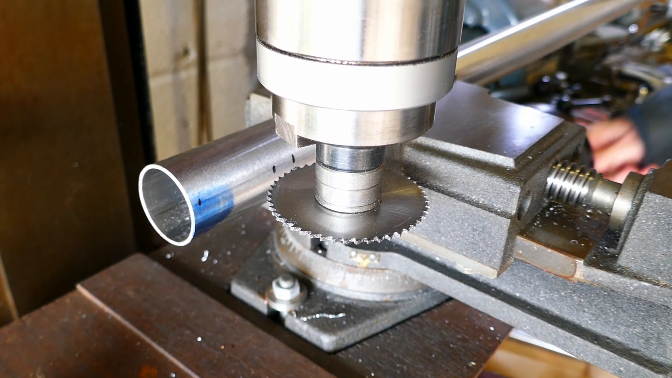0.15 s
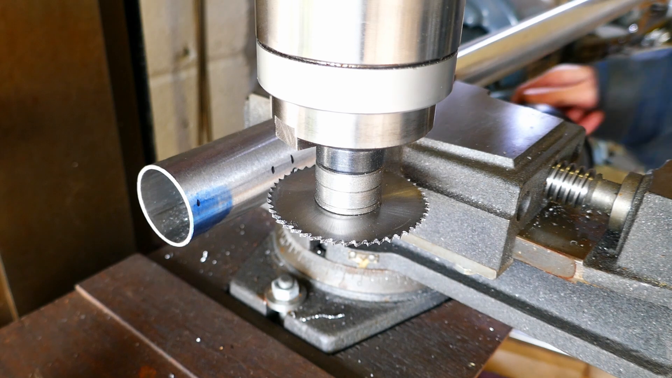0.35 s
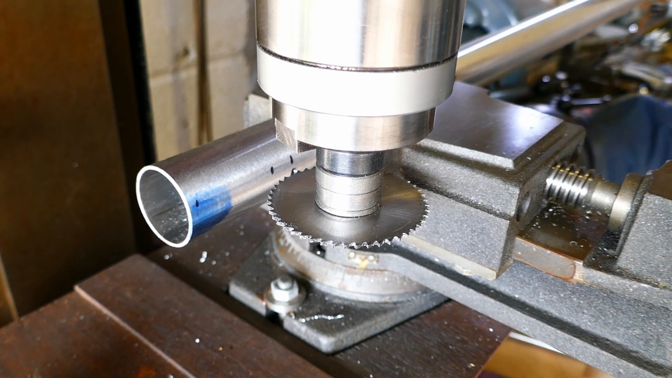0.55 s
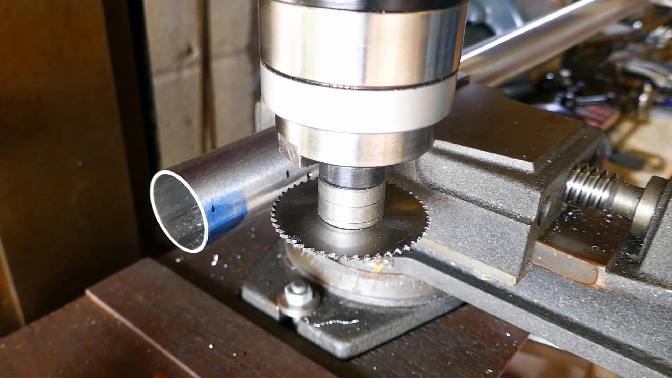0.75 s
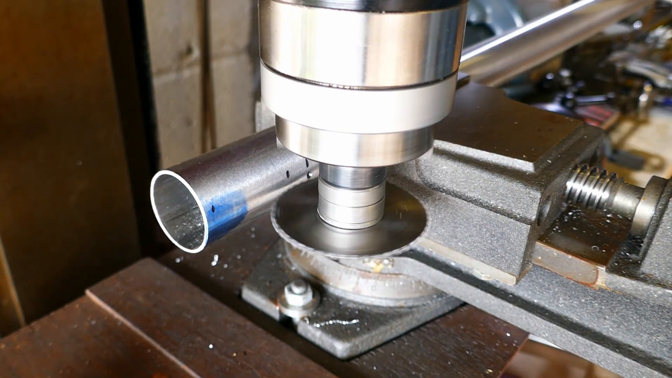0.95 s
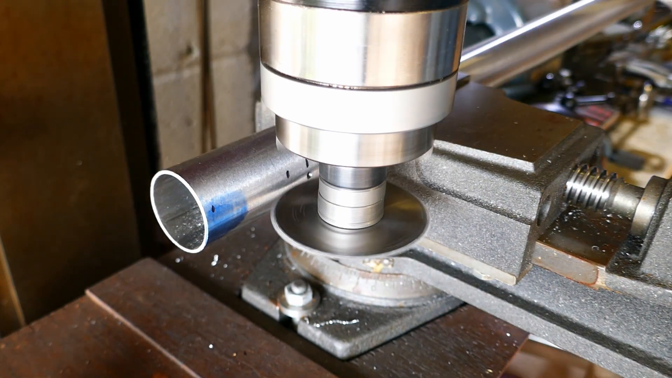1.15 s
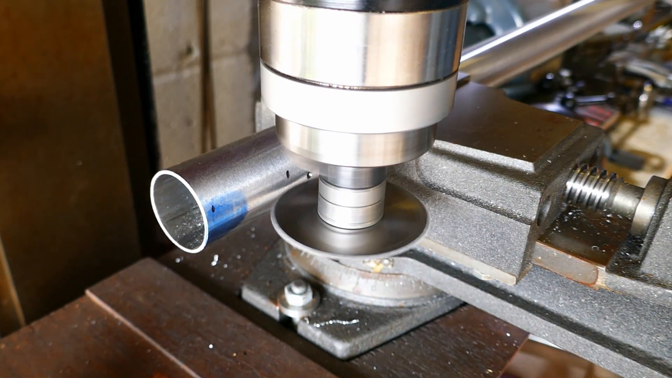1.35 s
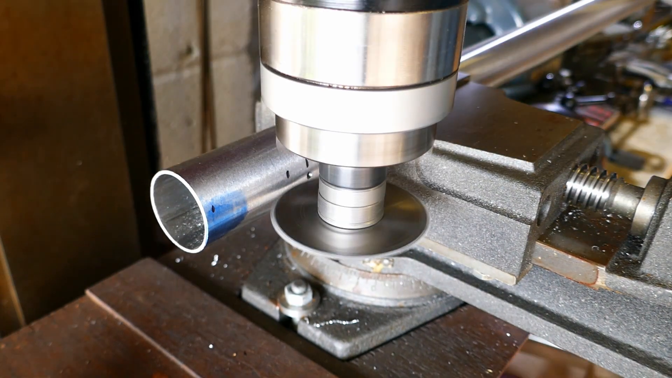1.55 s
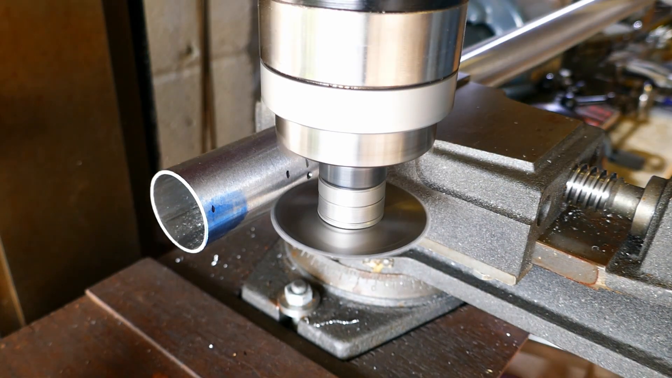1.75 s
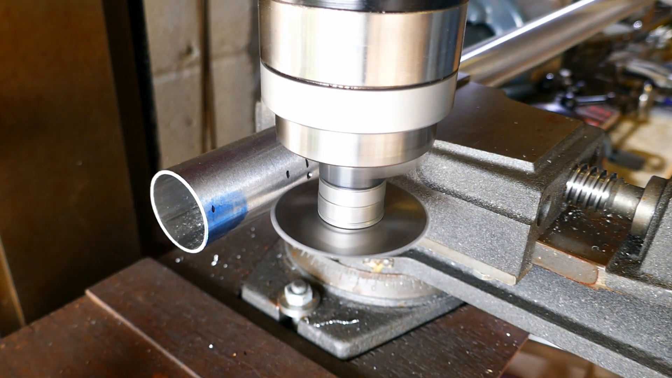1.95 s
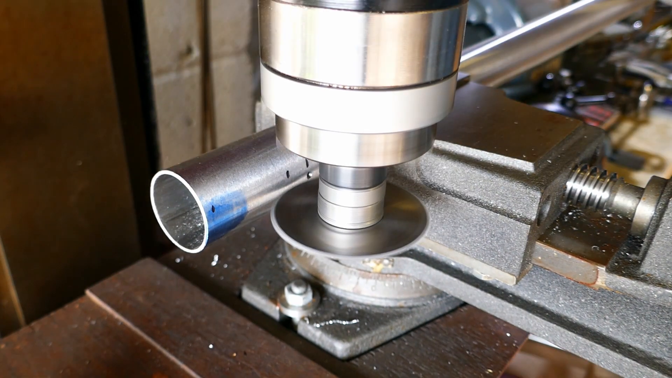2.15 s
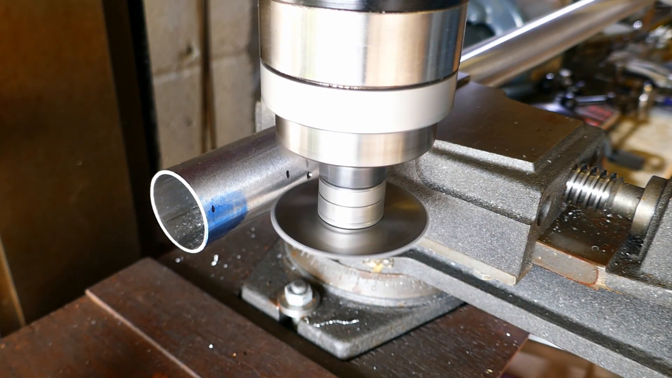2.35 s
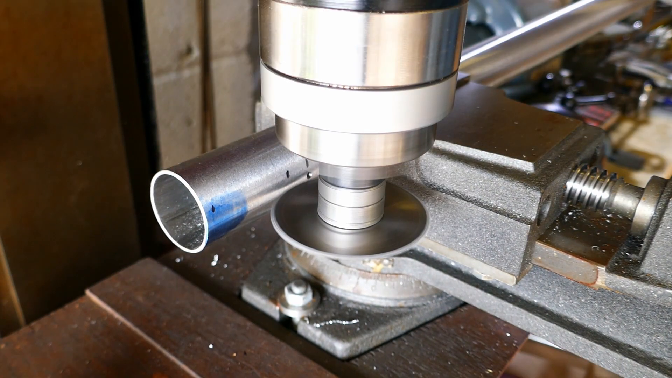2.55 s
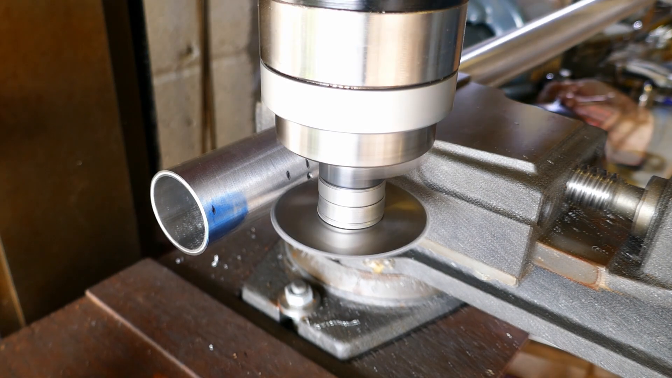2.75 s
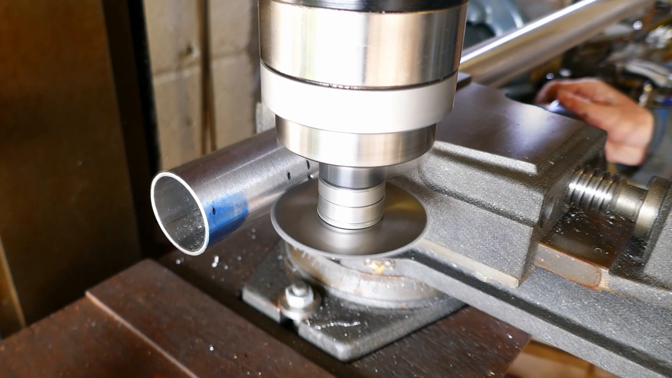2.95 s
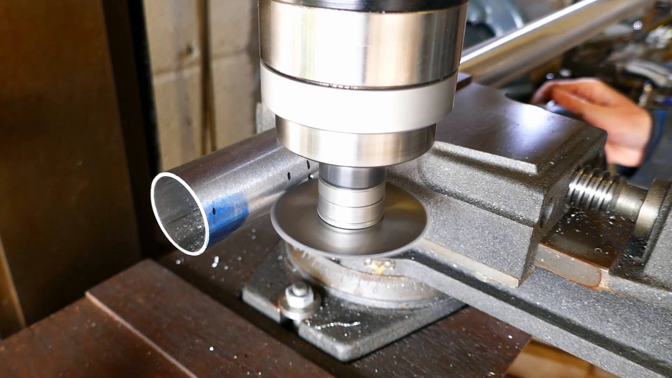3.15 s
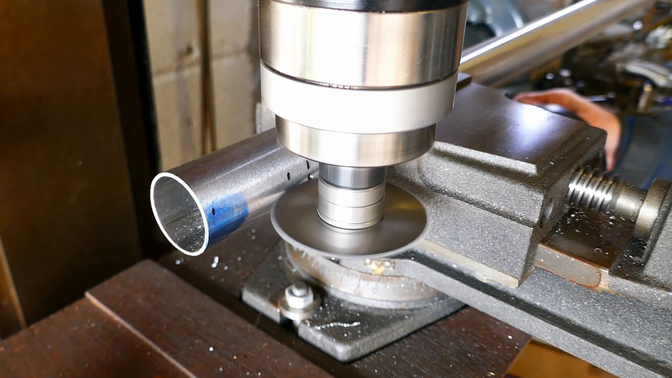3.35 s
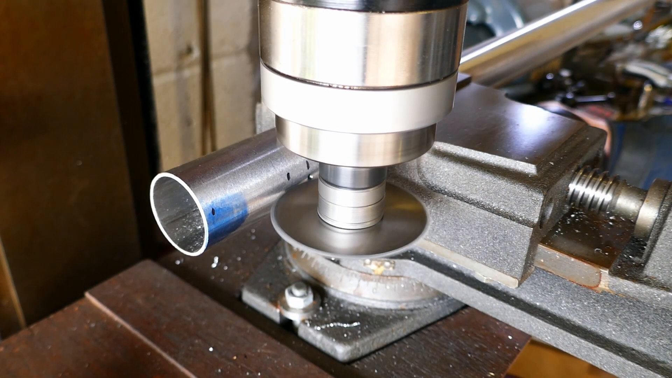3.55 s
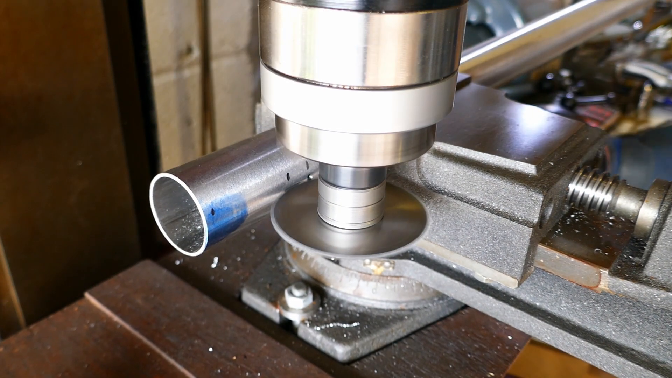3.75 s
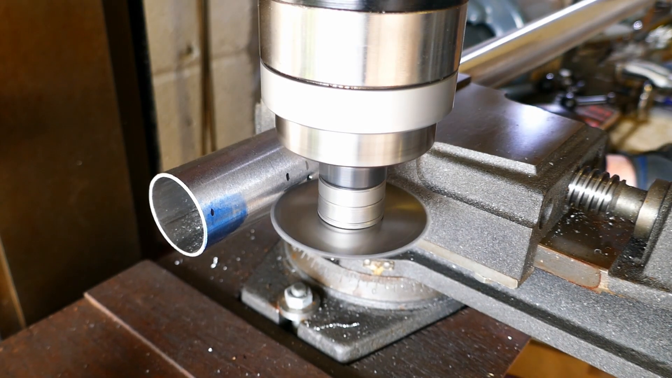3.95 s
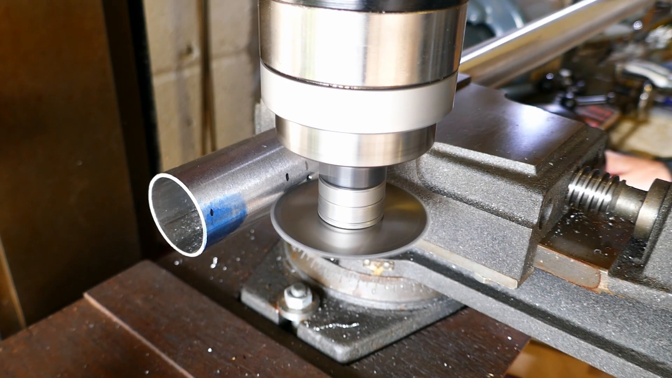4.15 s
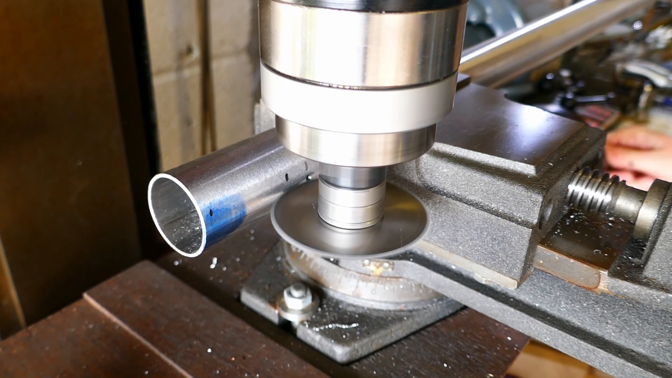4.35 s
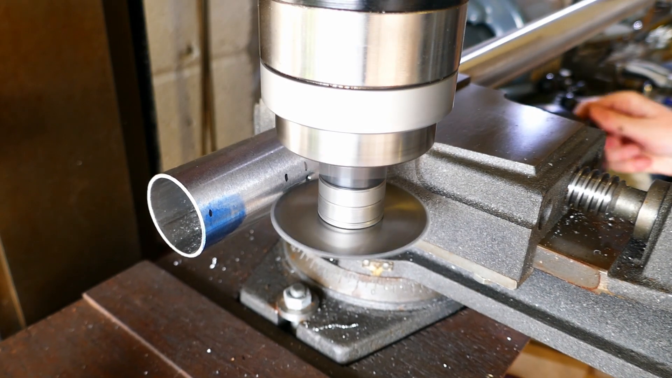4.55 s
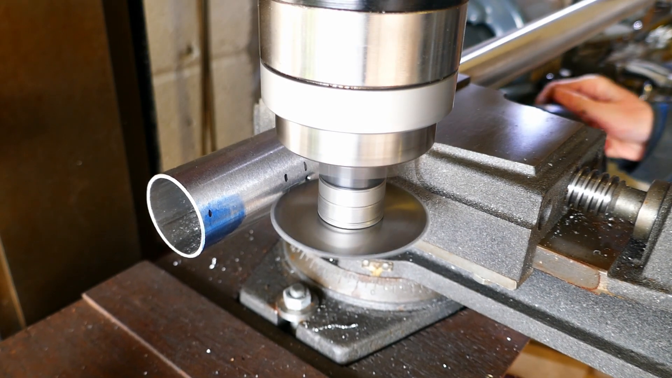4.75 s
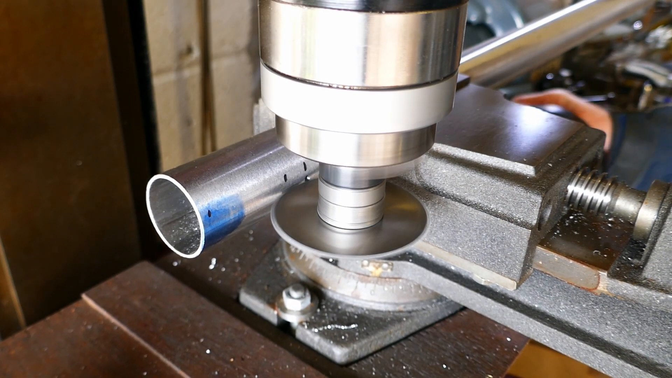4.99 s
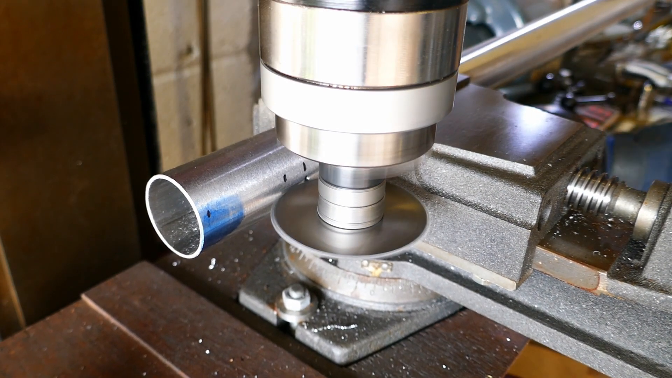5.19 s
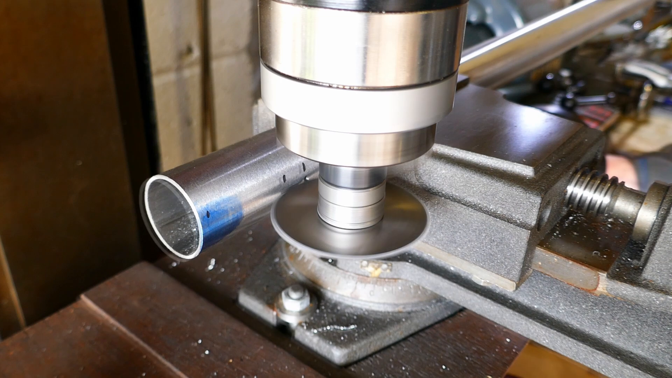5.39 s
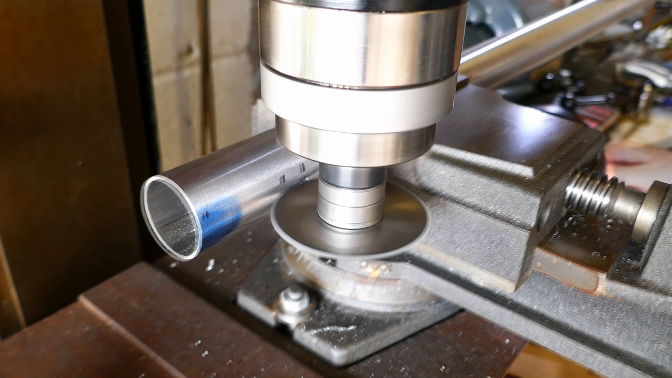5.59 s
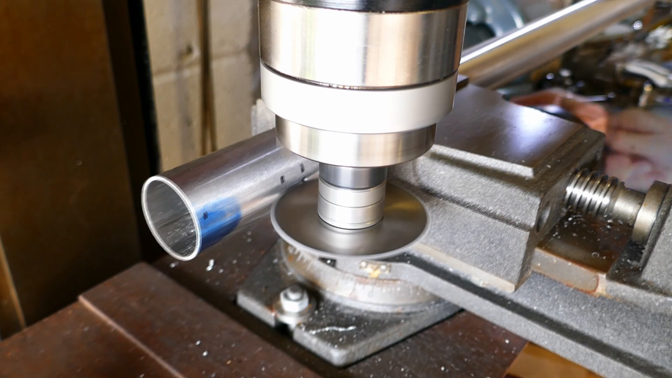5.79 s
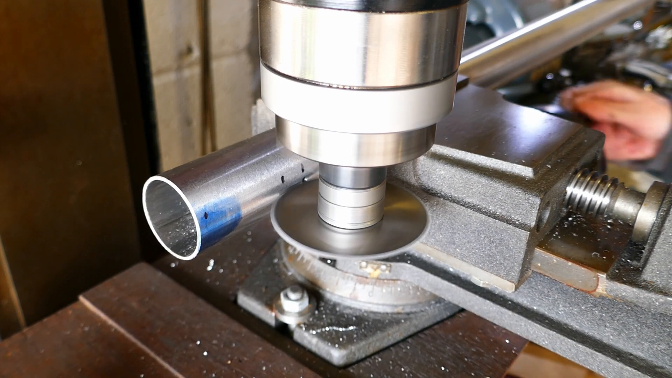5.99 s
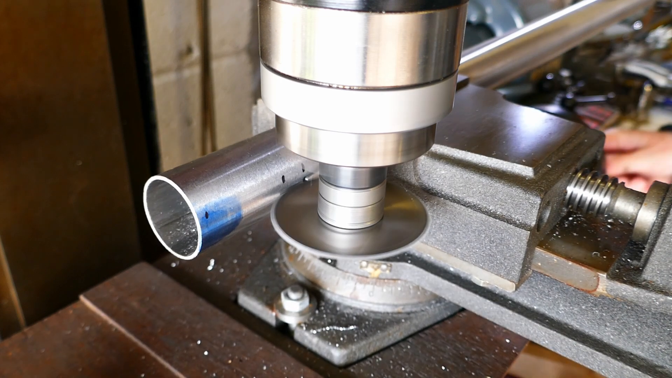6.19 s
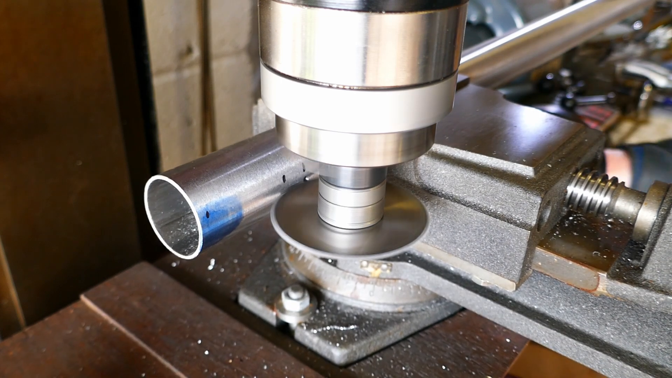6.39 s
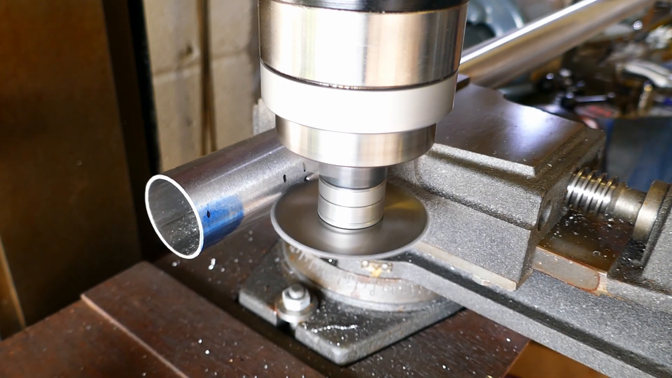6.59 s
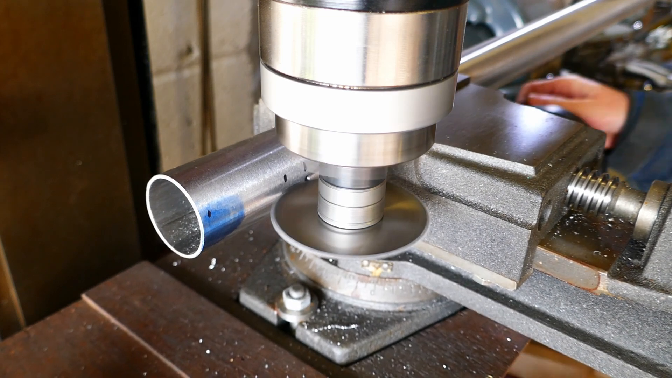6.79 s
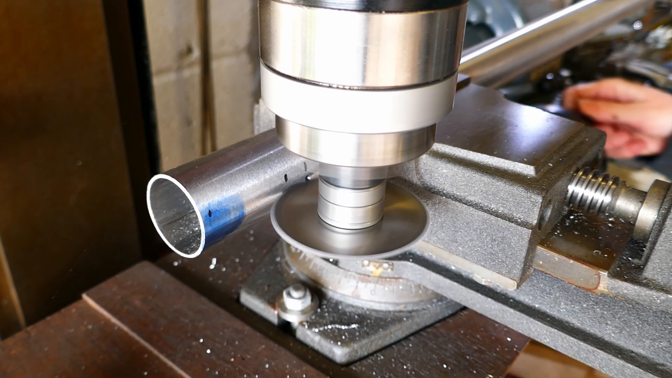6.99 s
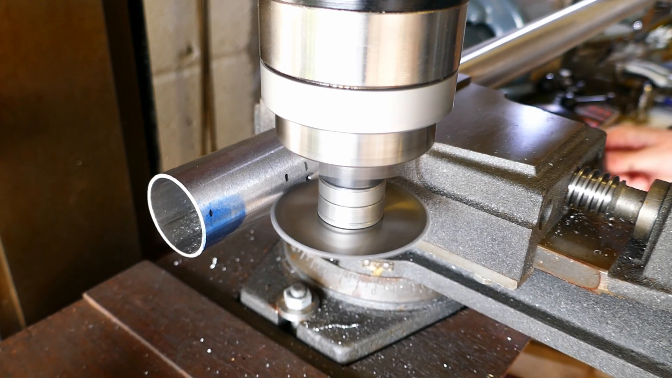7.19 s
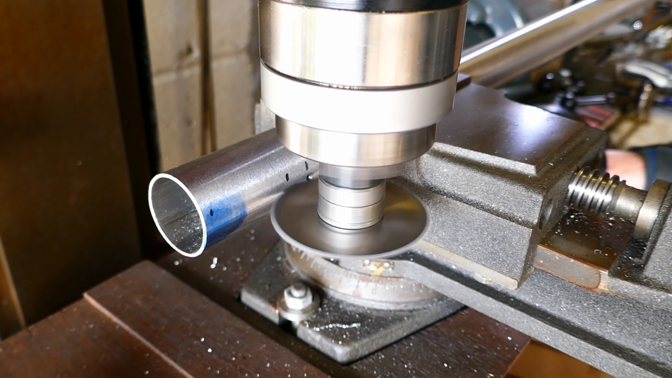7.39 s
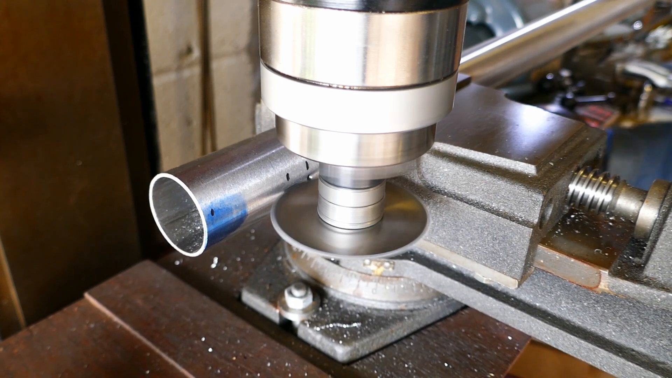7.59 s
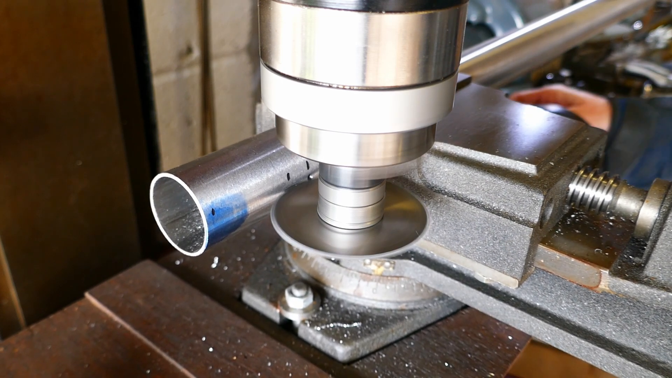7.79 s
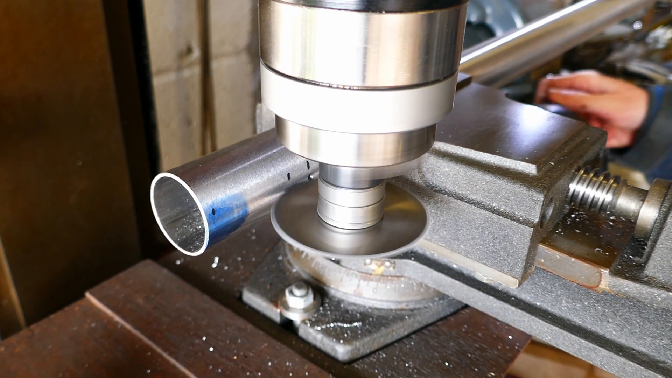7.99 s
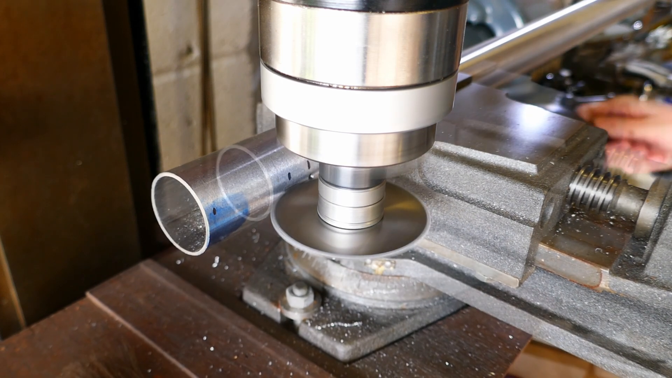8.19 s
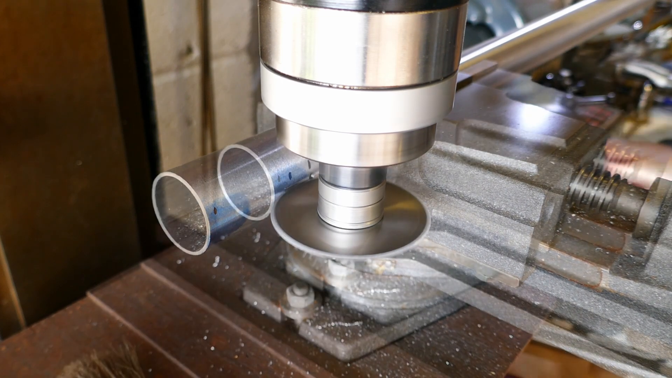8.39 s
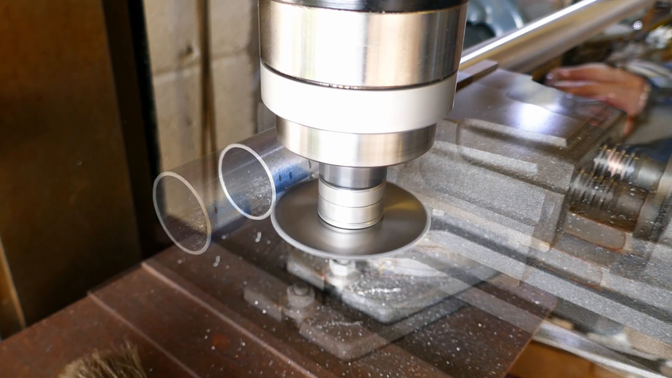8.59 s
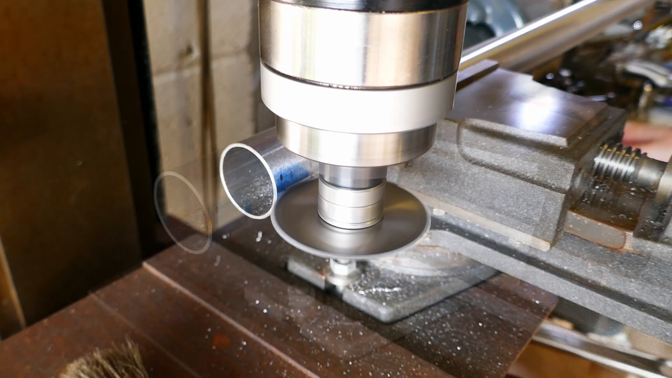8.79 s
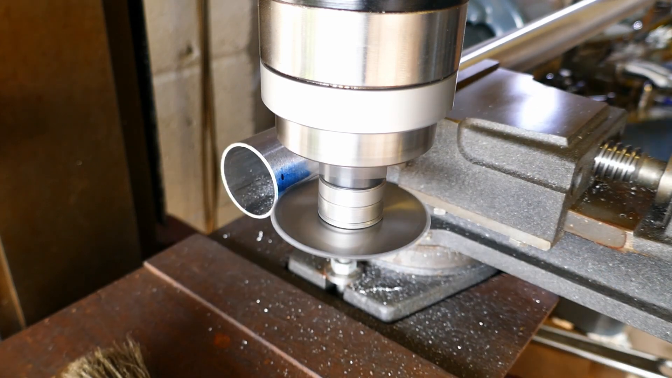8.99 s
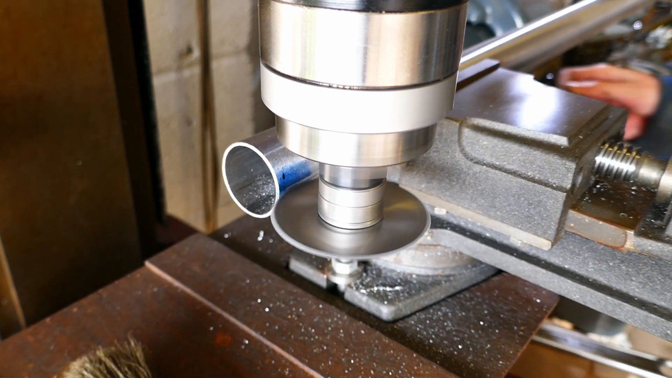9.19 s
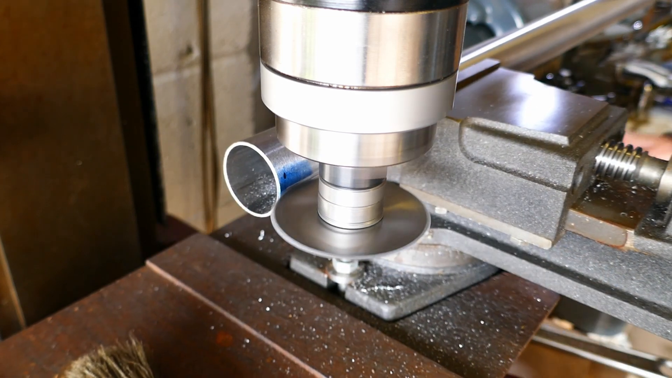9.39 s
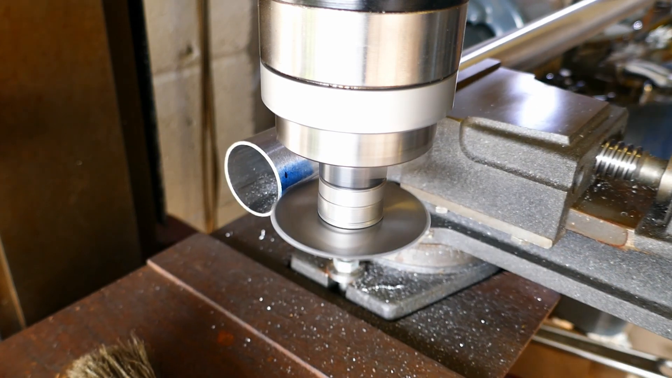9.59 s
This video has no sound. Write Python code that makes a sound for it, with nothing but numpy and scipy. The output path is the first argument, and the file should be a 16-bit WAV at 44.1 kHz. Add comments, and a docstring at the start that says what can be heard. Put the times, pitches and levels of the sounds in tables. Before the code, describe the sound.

Machine gears clatter and roar up, then a toothed blade crunches into thin metal tube about ten times a second, rasping and ringing.

```python
"""A handwheel squeaks over idling gears and a sliding table; a switch clunks and the drive runs up hard.
Then a slitting saw, slightly off centre, bites a thin steel tube once a turn: it rasps, tube and blade ring.
Toothed contacts are shaped noise, filtered by the cast frame's resonances or smeared by thin steel.
Rings are narrow-band modes driven by the load; squeaks, zings and gear tones are wavering sines.
The milling machine stands close by in a small workshop and is heard through two microphone ports."""
import sys
import numpy as np
from scipy import signal
from scipy.fft import rfft, irfft, next_fast_len
from scipy.io import wavfile

SR = 44100
rng = np.random.default_rng(int(sys.argv[2]) if len(sys.argv) > 2 else 0)


def log_audio(samples):
    """Write samples as a 16-bit WAV file to the path given in sys.argv[1]."""
    # one column per channel
    frames = np.atleast_2d(samples).T
    # limit to full scale, then quantise
    limited = np.clip(frames, -1, 1)
    pcm = np.round(limited * 32767).astype(np.int16)
    wavfile.write(sys.argv[1], SR, pcm)


N = 425124
T = np.arange(N) / SR
HZ = np.fft.rfftfreq(8192, 1 / SR)  # frequency grid of the colouring filters
EDGE_HZ = 15700  # upper edge of the sound

# Saw passes, one bite a turn: (first bite [s], end [s], one turn [s])
PASSES = [(2.8772, 5.76, .101752), (5.7809, 8.47, .10149), (8.5413, 9.64, .101645)]
# Grip of each pass before the mix: (crunch [dB], blade ring [dB], blade whistle [dB], rubbing [dB])
GRIP = [(-39.5, -55, -58, -56), (-40, -55.5, -56, -55.5), (-42.5, -59, -55, -60)]
# Teeth that catch in each pass, relative to the bite:
# (drag [dB], first tooth [dB], proud tooth after the bite [s], proud tooth [dB], late tooth [dB])
TEETH = [(-30, -7.5, 0.038, -1.5, -13.5), (-34, -15, 0.0399, -0.5, -26), (-15, -20, 0.0417, 1.5, -7)]
# Rasp as the feed varies: (time [s], level [dB])
RASP_LEVEL = [(2.8, -50), (4.3, -49.5), (5.75, -51), (5.78, -50), (6.2, -48), (6.6, -49.5), (7.25, -48),
              (7.62, -51), (8.25, -49), (8.65, -52.5), (9.64, -54.5)]
# Spectra of crunch and rasp: (frequency [Hz], relative density [dB])
CRUNCH_TONE = [(100, -37), (330, -16), (470, 0), (620, -13), (950, -2), (1400, 5.5), (1800, -4),
               (2150, -2.5), (2500, 2.5), (3200, -6), (6000, -27)]
RASP_TONE = [(1500, -32), (2500, -24), (2860, 2), (3100, -10), (3600, 3.5), (4060, -1.5), (4600, -7),
             (5100, -5.5), (5600, 0.5), (6600, 6.5), (7900, -8.5), (9100, 6.5), (9700, -7), (12900, -3.5),
             (14800, -18)]
# Squeals of chips and tooth tips: (frequency [Hz], width [Hz], relative level [dB])
CHIP_SQUEALS = [(3900, 590, -1), (5560, 110, -5), (6590, 13, -5), (9080, 170, -4.5)]
# Tube modes, then the rougher ones when clamped shorter: (frequency [Hz], width [Hz], relative level [dB])
TUBE_MODES = [(3335, 39, -15), (3805, 9.5, 0.8)]
SHORT_TUBE_MODES = [(2200, 32, -1.5), (3790, 16, -2.5), (3886, 55, -2), (4010, 80, -11), (11050, 900, -9),
                    (14200, 220, -14)]
# Tube ring, which swells and fades as the slot deepens: (time [s], level [dB])
TUBE_RING = [(2.86, -57), (3.0, -47.5), (3.19, -46), (3.4, -43), (3.5, -51.5), (3.8, -51.5), (4.32, -51),
             (4.42, -58), (4.72, -48), (4.82, -48.5), (4.93, -48), (5.3, -48), (5.53, -52.5), (5.74, -46.5),
             (5.79, -55.5), (5.89, -52), (6.3, -51), (6.5, -46.5), (6.7, -54), (6.9, -44.5), (7.11, -47),
             (7.21, -50.5), (7.41, -44.5), (7.9, -53), (8.12, -50.5), (8.43, -51.5), (8.96, -46.5),
             (9.35, -49), (9.64, -48)]
# Ringing kept up by rubbing between bites: (time [s], level relative to the bite [dB])
TUBE_SUSTAIN = [(2.86, -15), (3.3, -16), (3.6, -13.5), (5.76, -17.5), (5.8, -20), (7.2, -25), (7.7, -23),
                (8.6, -12), (9.64, -14)]
# Low and high zing of the chips, and chirp of the last cut: (time [s], level [dB])
LOW_ZING = [(2.86, -51), (3.2, -61), (3.4, -47), (3.7, -48.5), (3.9, -45.5), (4.41, -48), (4.52, -54),
            (5.74, -60), (6.15, -43.5), (6.5, -55), (6.61, -45), (6.91, -45), (7.11, -50.5), (7.3, -57),
            (7.72, -52), (7.82, -43), (7.92, -53), (9.64, -51)]
HIGH_ZING = [(2.86, -57), (3.1, -58), (4, -53), (5.7, -45.5), (5.9, -43.5), (6.6, -47.5), (6.8, -57.5),
             (8.5, -49)]
LAST_CHIRP = [(8.5, -47.5), (8.76, -50), (9, -46.5), (9.64, -51)]
# Low gear throb once a turn: (time [s], level [dB])
THROB_LEVEL = [(2.86, -59), (3.3, -62.5), (4, -60.5), (5.76, -58), (5.82, -80), (6.05, -70), (7.2, -72),
               (7.9, -63.5), (9.64, -60)]
# Gear clatter idling, running hard and cutting: (time [s], level [dB])
IDLE_LEVEL = [(0, -71), (.03, -51), (.2, -56), (.33, -52), (.42, -57.5), (.5, -51), (.57, -57.5),
              (.65, -56.5), (.68, -68)]
HARD_LEVEL = [(.93, -73), (1.0, -47), (1.12, -44.5), (1.2, -43), (1.31, -40), (1.43, -38), (1.49, -35.5),
              (1.7, -35), (2.0, -35), (2.3, -35.5), (2.86, -35.5), (2.89, -71)]
CUTTING_LEVEL = [(2.86, -50), (2.88, -44), (3.0, -45.5), (4.2, -45), (5.76, -44.5), (5.81, -48.5),
                 (7.5, -47), (7.9, -45.5), (8.45, -44.5), (8.7, -43.5), (9.64, -43.5)]
# Spectra of that clatter and of the harsh ring of hard running: (frequency [Hz], relative density [dB])
IDLE_TONE = [(30, -35), (70, -6), (140, 1), (330, 6), (600, -8), (950, -5.5), (1400, -4.5), (2100, -7),
             (3000, -16.5), (5000, -17), (7500, -30), (11000, -24), (14500, -48)]
HARD_TONE = [(30, -50), (110, -25.5), (175, -22), (330, -5.5), (600, -10), (980, -3), (1400, -2), (1850, 2),
             (2500, -5), (2900, -11), (3500, -6), (4500, -21.5), (6200, -28.5), (14000, -30.5)]
CUTTING_TONE = [(30, -50), (90, -42), (200, -19), (330, -5), (600, -9), (950, -2), (1400, -4), (2000, 1),
                (2500, -5), (2900, -8.5), (3350, -4.5), (4400, -11), (5000, -11.5), (7800, -17.5),
                (11000, -14), (14500, -25.5)]
STRAIN_TONE = [(800, -26), (1010, 15), (1300, 5), (2750, -11), (3110, 12), (3950, -16), (4400, 7.5),
               (5200, 1.5), (6200, -8), (7500, -1), (8500, -10), (10200, -5), (12900, -15), (13900, -2),
               (15500, -62)]
# Shudder of the column under load: (time [s], level [dB]), then (frequency [Hz], relative density [dB])
RUMBLE_LEVEL = [(.95, -57), (1.38, -56.5), (1.48, -60), (1.75, -63), (2.8, -66), (3.1, -67), (5.76, -64),
                (5.82, -88.5), (7.5, -74), (7.9, -65), (9.64, -65.5)]
RUMBLE_TONE = [(30, -29), (80, -2.5), (115, -15), (135, -16), (162, 8), (185, -9), (208, -0.5), (260, 12.5),
               (500, -56.5)]
# Resonances of the cast frame, table and vice: (frequency [Hz], width [Hz], full lift [dB])
FRAME_MODES = [(159, 69, 3.5), (206.6, 7.9, 16), (309, 19, 8), (349, 27.3, 16), (440.7, 9.6, 14),
               (505.4, 106, 12.5), (570, 67.4, 13.5), (613.8, 31.6, 18), (705, 53, 15), (799, 67, 13.5),
               (865, 32, 6), (915, 86, 11.5), (1030, 110, 3), (1173, 25, 10.5), (1444, 17.5, 9),
               (1640, 40, 7.5), (1746, 24, 9), (1890, 120, 9), (2098, 35, 11), (3176, 20, 11.5)]
# Wavering gear tones, of which the close pair beats: (frequency [Hz], relative level [dB])
GEAR_TONES = [(166.9, -87.5), (347.6, -69), (350.4, -65), (796.7, -72.5)]
# Their common gain: (time [s], level [dB])
GEAR_LEVEL = [(0, -5), (.64, -31), (.68, -40), (.92, -19.5), (1.1, 11.5), (1.3, 3), (1.42, 10),
              (1.46, 24.5), (1.54, 23), (1.59, 15), (1.66, 18), (2.05, 11.5), (2.8, -7), (3, 7), (5.7, 7),
              (5.9, 7), (9.64, 8)]
# Switch, clutch and gears taking up slack, before the mix:
# (time [s], knock [dB], thud [dB], tick [dB], clank [dB], 60 dB decay of the knock [s])
KNOCKS = [(0.617, -48, -62, -56.5, -77, 0.041), (0.7922, -34, -29.5, -31.5, -62, 0.016),
          (0.91, -41, -51, -38.5, -56, 0.26), (0.923, -30.5, -40.5, -41, -33.5, 0.15),
          (0.998, -41, -70, -57, -54, 0.12), (1.05, -40, -66, -60, -55, 0.22),
          (1.155, -35.5, -64, -59, -47, 0.13), (1.202, -33.5, -49, -50, -40, 0.052),
          (1.271, -37, -58, -40, -54.5, 0.1), (1.326, -32, -44, -53, -49, 0.082),
          (1.335, -37, -58, -44, -55, 0.091), (1.387, -32, -47, -43.5, -48, 0.051),
          (1.444, -35, -54, -41, -40, 0.082)]
# Spectra of knock, tick and thud: (frequency [Hz], relative density [dB])
KNOCK_TONE = [(50, -54.5), (150, -8), (400, 5.5), (700, 6.5), (1120, 8.5), (1500, 4), (2000, 6), (2900, -5),
              (3400, -8), (4500, -12), (7000, -30), (14000, -51)]
TICK_TONE = [(700, -8), (3000, 13), (5000, 1), (6300, -2), (7800, 3), (11000, 1), (15000, -6)]
THUD_TONE = [(50, -23), (120, -29), (172, 8), (250, -2), (310, -2), (410, -8), (520, -6), (1300, -10.5),
             (2200, -3), (2850, -7), (4000, -33), (8000, -39)]
# Struck modes of the housing and the gears: (frequency [Hz], relative level [dB], 60 dB decay [s])
HOUSING_MODES = [(167.7, -4, 0.41), (201, 6.5, 0.15), (303, -9, 0.86), (409, -6, 0.36), (455, -1.5, 0.22),
                 (727, -7.5, 0.25)]
GEAR_MODES = [(553, -1.5, 0.23), (710, -4, 0.34), (798, 3, .08), (920, 1.5, .15), (1160, 1, 0.16)]
# Squeaks: (time [s], length [s], start [Hz], end [Hz], relative level [dB], fall per overtone [dB])
SQUEAKS = [(.05, 0.09, 2170, 2090, -59, 30), (0.275, 0.051, 1640, 1710, -54, 30),
           (0.316, 0.053, 11330, 11250, -43, 40), (0.337, 0.028, 1650, 1580, -40, 26),
           (0.357, 0.0364, 2900, 2660, -44, 12), (0.365, 0.082, 2880, 2750, -51.5, 14),
           (0.488, 0.066, 2150, 2120, -60, 30)]
# Table sliding on its ways: (time [s], level [dB]), then (frequency [Hz], relative density [dB])
SLIDE_LEVEL = [(0, -57), (.03, -54), (.1, -65), (.28, -75), (.38, -55.5), (.47, -55), (.56, -69),
               (.68, -100)]
SLIDE_TONE = [(1500, 7), (3000, 3), (5000, -6), (7500, -4), (11000, -1.5), (14000, -2), (15500, -9)]
# Quiet of the workshop: (frequency [Hz], relative density [dB])
ROOM_TONE = [(18, -35), (30, -51), (75, -10), (240, -2), (2080, -15.5), (5880, -39), (15000, -32)]
# Likeness of the two ports: (frequency [Hz], coherence [0-1])
PORT_LIKENESS = [(30, 0.2), (120, 0.8), (480, 0.955), (2000, 0.95), (3800, 0.88), (7500, 0.88),
                 (12000, 0.8)]
# Level difference of the ports: (frequency [Hz], left minus right [dB])
PORT_LEAN = [(160, -1), (480, 2.5), (1200, 2.5), (2000, .5), (3300, 0), (5000, 2.5), (9000, -0.6)]
# Phase difference of the ports: (frequency [Hz], left ahead of right [rad])
PORT_LEAD = [(200, 0.3), (690, 0.45), (1500, 0.35), (3000, 0.28), (4000, -0.96), (5200, -0.85), (8000, -2),
             (10200, 1)]

# Blade ring and whistle: (frequency [Hz], width [Hz], relative level [dB])
BLADE, WHISTLE = [(10220, 35, 1.6)], [(12320, 73, -1)]
# Tones of the idling drive and whine of hard running: (frequency [Hz], level relative to the clatter [dB])
IDLE_TONES, HARD_TONES = [(425.3, -6), (925.9, -12)], [(3085, -26.5)]

# Load on teeth, push into the frame, jolt to the tube: (attack [s], hold [s], release time constant [s])
TOOTH_SHAPE, PUSH_SHAPE = (0.0063, 0.012, 0.0067), (0.011, 0.0032, 0.0092)
STRIKE_SHAPE = (0.003, 0.0035, 0.011)
HOLD_SCATTER = .4  # share by which a bite is held longer or shorter
ENTRY_S = 0.0033  # the teeth touch this long before the bite
FIRST_TOOTH_S, FIRST_WIDTH_S = 0.0029, 0.0011  # snap of the first tooth
DRAG_S, DRAG_WIDTH_S = 0.098, 0.0062  # the teeth drag along the slot late in the turn
PROUD_WIDTH_S = 0.0029  # width of the proud and late scrapes
LATE_TOOTH_S, LATE_RING_DB = 0.0817, 12  # a late tooth grazes; it rings the blade more than it rasps
WHISTLE_LAG_S = .011  # the blade whistles again as it springs back
PUSH_REST_DB, PUSH_REST_S = -7, 0.032  # lingering push and its time constant
CRUNCH_LIKENESS, RASP_LIKENESS = .8, .55  # how closely each bite repeats the last (0-1)
CRUNCH_GROWTH, RUB_GROWTH = 0.91, 3.6  # dB for each dB of cutting effort
# Chance differences from bite to bite [dB]
CRUNCH_SCATTER_DB, RASP_SCATTER_DB, TUBE_SCATTER_DB, BLADE_SCATTER_DB = 1.34, 1, 2.3, 2.5
ZING_SCATTER_DB = 1
RECLAMPED = (8.45, 8.6)  # the shorter clamping takes over between these times [s]
THROB_HZ, THROB_LATE_S, THROB_WIDTH_S = 164.3, 0.044, 0.014
# The column drones briefly, and more faintly along with the hard running
DRONE_HZ, DRONE_S, DRONE_WIDTH_S, DRONE_DB, DRONE_UNDER_DB = 205, 1.62, 0.058, -48.5, -30


def saw():
    """Intermittent cutting: chips tear off under the high side of the blade and force steel modes to ring."""
    current_pass = np.searchsorted([end for _, end, _ in PASSES[:-1]], T)
    crunch_gain, blade_gain, whistle_gain, rub_gain = amp(np.transpose(GRIP))[:, current_pass]
    effort = level(CUTTING_LEVEL) / level(CUTTING_LEVEL).max()
    load = each_turn(tooth_load, RASP_SCATTER_DB) * level(RASP_LEVEL)
    rub = rub_gain * effort ** RUB_GROWTH * amp(6.1 * wander(51))

    force = each_turn(push, CRUNCH_SCATTER_DB) * crunch_gain * effort ** CRUNCH_GROWTH
    crunch_grain = same_teeth(grit(per_s=1800, spread_db=2.5, smooth=0.4), CRUNCH_LIKENESS)
    crunch = colour(crunch_grain * force, CRUNCH_TONE, frame=1.0)

    rasp_grain = same_teeth(grit(per_s=2500, spread_db=1.7, smooth=0.19), RASP_LIKENESS)
    chips = rasp_grain * np.hypot(load, 0.084 * rub)
    rasp = colour(clang(chips, t60=0.028, wet_db=15.0), RASP_TONE)
    squeal = chatter(np.hypot(load, 0.059 * rub), CHIP_SQUEALS, steady=0.034)

    tube_load = np.hypot(each_turn(tube_strike, TUBE_SCATTER_DB), level(TUBE_SUSTAIN)) * level(TUBE_RING)
    short = np.interp(T, RECLAMPED, (0, 1))
    tube = chatter(tube_load * (1 - short), TUBE_MODES, steady=.9)
    tube += chatter(tube_load * short, SHORT_TUBE_MODES, steady=0.16)

    blade_load = each_turn(lambda t, k: tooth_load(t, k, LATE_RING_DB), BLADE_SCATTER_DB)
    whistle_load = each_turn(whistle_contact, BLADE_SCATTER_DB)
    blade = chatter(np.hypot(blade_load * blade_gain, 0.7 * rub), BLADE, steady=.95)
    blade += chatter(np.hypot(whistle_load * whistle_gain, 0.3 * rub), WHISTLE, steady=.85)
    return amp(1.4) * crunch + amp(3.0) * rasp + amp(-5.0) * squeal + amp(4.0) * tube + amp(1.5) * blade


def tooth_load(t, k, late_boost_db=0):
    """Runout of the blade: drag, first snap and main bite, then scrapes of a proud and a late tooth."""
    drag_db, first_db, proud_s, proud_db, late_db = TEETH[k]
    attack, hold, release = TOOTH_SHAPE
    bite = stroke(t, attack, hold * (1 + HOLD_SCATTER * rng.uniform(-0.95, 1)), release)
    drag = amp(drag_db) * swell(t, DRAG_S, DRAG_WIDTH_S)
    snap = amp(first_db) * swell(t, FIRST_TOOTH_S, FIRST_WIDTH_S)
    proud = amp(proud_db) * swell(t, proud_s, PROUD_WIDTH_S)
    late = amp(late_db + late_boost_db) * swell(t, LATE_TOOTH_S, PROUD_WIDTH_S)
    return drag + snap + bite + proud + late


def whistle_contact(t, k):
    """Elastic recoil: the blade is excited at each contact and again as it springs back."""
    return np.maximum(tooth_load(t, k), tooth_load(t - WHISTLE_LAG_S, k))


def push(t, k):
    """Reaction force: the first tooth jolts the frame; the push then builds slowly and partly lingers."""
    attack, hold, release = PUSH_SHAPE
    jolt = amp(TEETH[k][1] - 5.0) * swell(t, FIRST_TOOTH_S, FIRST_WIDTH_S)
    rest = amp(PUSH_REST_DB) * stroke(t, attack, hold, PUSH_REST_S)
    return jolt + np.maximum(stroke(t, attack, hold, release), rest)


def tube_strike(t, k):
    """Impulsive excitation: the tube is struck as the teeth enter, and again by the late tooth."""
    return stroke(t, *STRIKE_SHAPE) + amp(TEETH[k][-1] + 3.0) * swell(t, LATE_TOOTH_S, PROUD_WIDTH_S)


def stroke(t, attack, hold, release):
    """Force envelope: the high side of the blade enters the steel, cuts and lets go exponentially."""
    t = t + ENTRY_S
    return np.clip(t / attack, 0, 1) * np.exp(-np.maximum(t - attack - hold, 0) / release)


def swell(t, centre_s, width_s):
    """Gaussian pulse: a bell-shaped rise and fall."""
    return np.exp(-((t - centre_s) / width_s) ** 2)


def each_turn(shape, scatter_db):
    """Periodic forcing: one shape a turn, of time since the bite and pass, with chance strength."""
    out, t = np.zeros(N), np.arange(-SR // 100, SR // 8) / SR
    for k, (first, end, turn_s) in enumerate(PASSES):
        for s in np.arange(first, end, turn_s):
            strength = amp(scatter_db * np.sqrt(3) * rng.uniform(-1, 1))  # scatter_db is the rms
            add(out, s + t[0], strength * shape(t, k))
    return out


def same_teeth(x, likeness):
    """Cyclic correlation: the same teeth return, so each bite partly repeats the grain of the last."""
    out = x.copy()
    for first, end, turn_s in PASSES:
        size = round(turn_s * SR)
        for i in range(round(first * SR), min(round(end * SR), N), size):
            now = out[:, i:i + size]
            before = out[:, i - size:i][:, :now.shape[1]]
            out[:, i:i + size] = likeness * before + np.sqrt(1 - likeness ** 2) * now
    return out


def chatter(load, modes, steady):
    """Forced resonance: modes swell with the load and ring on; rubbing teeth keep their strength steady."""
    out = np.zeros((2, N))
    for hz, width, db in modes:
        r, skirt = np.exp(-np.pi * width / SR), np.exp(-np.pi * 600 / SR)
        turn = np.exp(2j * np.pi * hz * T)
        # noise shifted down to zero frequency, narrowed there, then shifted back
        swing = signal.lfilter([1], np.poly([r, skirt]), rng.standard_normal((2, N)) * turn.conj())
        swing /= (abs(swing) + 1e-9) ** steady
        energy = signal.lfilter([1 - r * r], [1, -r * r], load ** 2)
        out += amp(db) * unit((turn * swing).real) * np.sqrt(energy)
    return out


def clang(x, t60, wet_db):
    """Modal overlap: many close modes of thin steel smear impacts into a short ring, nearly even in colour."""
    t = np.arange(SR // 10) / SR
    tail = rng.standard_normal((2, len(t))) * amp(-60 * t / t60)
    tail /= np.linalg.norm(tail, axis=1, keepdims=True)
    ring = rfft((t == 0) + amp(wet_db) * tail, 2 * len(t))
    # a minimum-phase inverse flattens most of the colour
    log_gain = np.log(abs(np.c_[ring, ring[:, -2:0:-1]]) + 1e-3)
    flatten = np.exp(-.8 * np.conj(signal.hilbert(log_gain)))[:, :ring.shape[1]]
    ring = irfft(ring * flatten)[:, :len(t)]
    return signal.oaconvolve(x, ring / np.linalg.norm(ring, axis=1, keepdims=True), axes=1)[:, :N]


def zings():
    """Stick-slip of chips: metallic notes top each stroke and turn into broad chirps in the last cut."""
    low = zing(hz=2825, scatter_hz=25, glide_hz_per_s=3750, rough_hz=30, late_s=0.014, width_s=0.0071)
    high = zing(hz=4130, scatter_hz=91, glide_hz_per_s=4700, rough_hz=80, late_s=0.0095, width_s=0.0037)
    last = zing(hz=4020, scatter_hz=89, glide_hz_per_s=3400, rough_hz=90, late_s=0.0144, width_s=0.016)
    return low * level(LOW_ZING) + high * level(HIGH_ZING) + last * level(LAST_CHIRP)


def zing(hz, scatter_hz, glide_hz_per_s, rough_hz, late_s, width_s):
    """Phase diffusion: once a turn, a short gliding note of uncertain pitch."""
    def note(t, k):
        pitch = hz + scatter_hz * rng.uniform(-0.98, 1) + glide_hz_per_s * (t - late_s)
        drift = np.sqrt(2 * np.pi * rough_hz / SR) * rng.standard_normal(len(t))
        return np.sqrt(2) * swell(t, late_s, width_s) * np.sin(np.cumsum(2 * np.pi * pitch / SR + drift))
    return each_turn(note, ZING_SCATTER_DB)


def throb():
    """Amplitude modulation: a low gear throb, a soft 164 Hz pulse once a turn, after each bite."""
    pulses = each_turn(lambda t, k: swell(t, THROB_LATE_S, THROB_WIDTH_S), CRUNCH_SCATTER_DB)
    tone = np.sqrt(2) * np.sin(2 * np.pi * THROB_HZ * T + wander(6.4))
    return tone * pulses * level(THROB_LEVEL)


def gears():
    """Backlash impacts: teeth rattle about eight times a spindle turn and excite the frame's resonances."""
    knock_hz = 78.4
    beat = unit(amp(1.3 * np.cos(2 * np.pi * knock_hz * T + 1.88 * wander(9.4)) + .5 * wander(36)))
    rattle = grit(per_s=3500, spread_db=1.0, smooth=0.91) * beat
    effort = level(HARD_LEVEL)
    idle = colour(rattle * level(IDLE_LEVEL), IDLE_TONE, frame=0.81)
    hard = colour(clang(rattle, t60=0.086, wet_db=-3.5) * effort, HARD_TONE, frame=0.87)
    # the treble grows faster than the effort
    flanks = grit(per_s=1800, spread_db=3.5, smooth=1.0) * beat
    strain = amp(-45.5) * colour(flanks * (effort / effort.max()) ** 1.9, STRAIN_TONE, frame=0.53)
    cutting = colour(rattle * level(CUTTING_LEVEL), CUTTING_TONE, frame=0.74)
    rumble = colour(rng.standard_normal((2, N)) * level(RUMBLE_LEVEL), RUMBLE_TONE, frame=0.57)
    return idle + hard + strain + cutting + rumble


def whine():
    """Gear meshing: its tones and the column's drone waver in pitch and strength; close tones beat."""
    hard = level(HARD_LEVEL)
    mesh = tones(GEAR_TONES) * level(GEAR_LEVEL)
    mesh += tones(IDLE_TONES) * level(IDLE_LEVEL) + tones(HARD_TONES) * hard
    drone = amp(DRONE_DB) * swell(T, DRONE_S, DRONE_WIDTH_S) + amp(DRONE_UNDER_DB) * hard
    return mesh + wavering(DRONE_HZ) * drone


def wavering(hz):
    """Random modulation: a sine slowly varied in phase and amplitude."""
    return np.sqrt(2) * amp(2 * wander(8.1)) * np.sin(2 * np.pi * hz * T + wander(8.8))


def tones(rows):
    """Superposition of independently wavering sines."""
    return sum(amp(db) * wavering(hz) for hz, db in rows)


def knocks():
    """Impact excitation: a frame rattle, a sharp tick, a clank of gears and a longer thud of the housing."""
    body, tick, thud, rings = np.zeros((4, 2, N))
    t = np.arange(SR // 2) / SR
    for s, knock_db, thud_db, tick_db, clank_db, t60 in KNOCKS:
        add(rings[0], s, amp(thud_db - 5.0) * ringing(HOUSING_MODES, t, rise_s=0.016))
        add(rings[0], s, amp(clank_db) * ringing(GEAR_MODES, t, rise_s=0.0034))
        burst = rng.standard_normal((3, 2, len(t))) * (1 - np.exp(-t / 0.0012))
        add(body, s, burst[0] * amp(knock_db - 60 * t / t60))
        # the tick dies fast, over a weaker slow tail
        tick_decay = amp(-60 * t / 0.031) + amp(-12.5 - 60 * t / 0.24)
        add(tick, s, burst[1] * amp(tick_db) * tick_decay)
        add(thud, s, burst[2] * amp(thud_db - 60 * t / 0.22))
    rattle = colour(body, KNOCK_TONE, frame=.4)
    return rattle + colour(tick, TICK_TONE) + amp(-7.0) * colour(thud, THUD_TONE) + rings


def ringing(modes, t, rise_s):
    """Damped free vibration: struck modes swell quickly and decay, with chance phases at every blow."""
    start = rng.uniform(0, 2 * np.pi, len(modes))
    partials = sum(amp(db - 60 * t / t60) * np.sin(2 * np.pi * hz * t + phase)
                   for (hz, db, t60), phase in zip(modes, start))
    return partials * (1 - np.exp(-t / rise_s))


def handwheel():
    """Stick-slip friction: short harmonic squeaks, rough in pitch and strength."""
    out, jitter, grip = np.zeros(N), wander(460), unit(amp(2.4 * wander(400)))
    for s, length, start_hz, end_hz, db, fall_db in SQUEAKS:
        count = int(length * SR)
        hz = np.linspace(start_hz, end_hz, count) + 60 * jitter[int(s * SR):][:count]
        phase = 2 * np.pi * np.cumsum(hz) / SR
        tone = sum(amp(db - fall_db * k) * np.sin((k + 1) * phase)
                   for k in range(3) if (k + 1) * start_hz < EDGE_HZ)
        add(out, s, np.sqrt(2) * tone * np.hanning(count))
    return out * grip


def background():
    """Broadband noise: the friction hiss of the sliding table and the quiet of the workshop."""
    slide = colour(rng.standard_normal((2, N)) * level(SLIDE_LEVEL), SLIDE_TONE)
    return slide + amp(-64.5) * colour(rng.standard_normal((2, N)), ROOM_TONE)


def ports(paths):
    """Partial coherence: both ports hear the direct path; the scattered path tells them apart."""
    hz = np.fft.rfftfreq(N, 1 / SR)
    direct, scattered = rfft(paths)
    same = read(PORT_LIKENESS, hz)
    common, apart = direct * np.sqrt((1 + same) / 2), scattered * np.sqrt((1 - same) / 2)
    lean = amp(read(PORT_LEAN, hz) / 2) * np.exp(1j * read(PORT_LEAD, hz) / 2)
    return irfft(np.array([(common + apart) * lean, (common - apart) / lean]), N)


def grit(per_s, spread_db, smooth):
    """Granular friction: uneven tiny impacts over a smooth share of noise, on two sound paths."""
    size = (rng.random(N) < per_s / SR) * amp(spread_db * np.minimum(rng.exponential(1, N), 4))
    impacts = unit(size * rng.standard_normal((2, N)))
    return unit(impacts + smooth * rng.standard_normal((2, N)))


def colour(x, tone, frame=0):
    """Minimum-phase filtering at unit power; frame is how strongly the frame's resonances stand out."""
    lifts = sum(lift / (1 + (2 * (HZ - f) / width) ** 2) for f, width, lift in FRAME_MODES)
    db = read(tone, HZ) + frame * lifts
    log_gain = np.log(amp(np.r_[db, db[-2:0:-1]]))
    taps = np.fft.ifft(np.exp(np.conj(signal.hilbert(log_gain)))).real[:len(HZ)]
    return signal.oaconvolve(x, taps[None] / np.linalg.norm(taps), axes=1)[:, :N]


def wander(hz):
    """Low-pass random process of rms 1, up to about hz."""
    size = next_fast_len(N // 8)
    f = np.fft.rfftfreq(size, T[-1] / size)
    slow = irfft(rfft(rng.standard_normal(size)) * np.exp(-(f / hz) ** 2), size)
    return unit(np.interp(T, np.linspace(0, T[-1], size), slow))


def amp(db):
    """Decibel law: amplitude ratio of a level."""
    return 10 ** (np.asarray(db) / 20)


def unit(x):
    """Normalisation to rms 1."""
    return x / np.sqrt(np.mean(x ** 2) + 1e-20)


def read(points, hz):
    """Interpolation of a spectrum by straight lines on a log frequency axis."""
    f, value = np.transpose(points)
    return np.interp(np.log(hz + 1), np.log(f), value)


def level(rows, t=T):
    """Gain from a piecewise-linear dB curve, practically silent outside its span."""
    s, db = np.transpose(rows)
    return amp(np.interp(t, s, db, left=-140, right=-140))


def add(mix, s, sound):
    """Superposition: adds a sound into the mix from time s."""
    part = mix[..., max(round(s * SR), 0):][..., :sound.shape[-1]]
    part += sound[..., :part.shape[-1]]


def scene():
    """Superposition of all sources; the purely tonal ones take only the direct path."""
    paths = saw() + gears() + knocks() + background()
    paths[0] += zings() + throb() + whine() + handwheel()
    return ports(paths)


def record(dry):
    """Band limitation by a linear-phase low-pass filter."""
    lowpass = signal.firwin(511, EDGE_HZ, window=("kaiser", 9), fs=SR)
    return signal.oaconvolve(dry, lowpass[None], "same")


dry = scene()
out = record(dry)
log_audio(out)
```